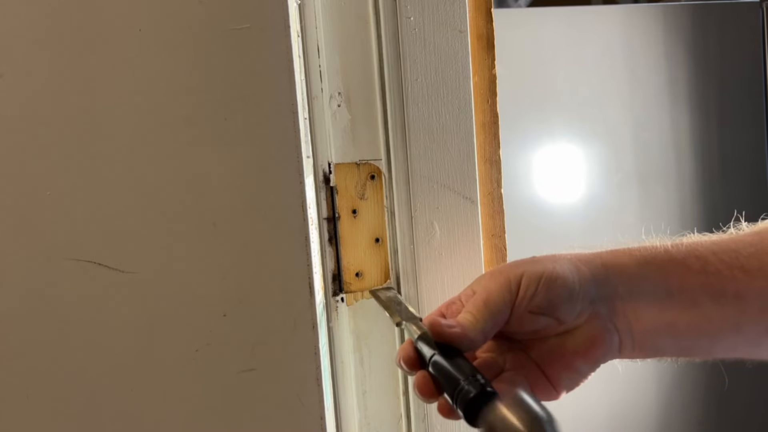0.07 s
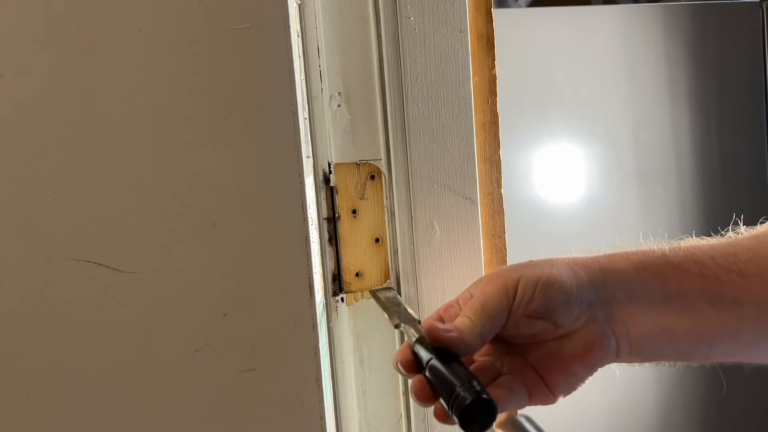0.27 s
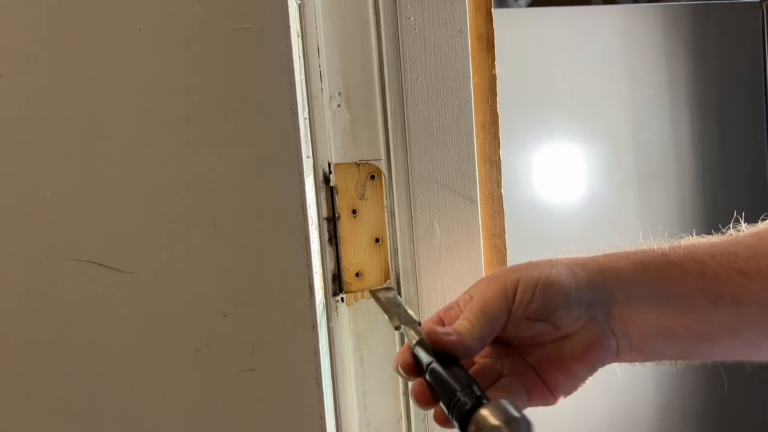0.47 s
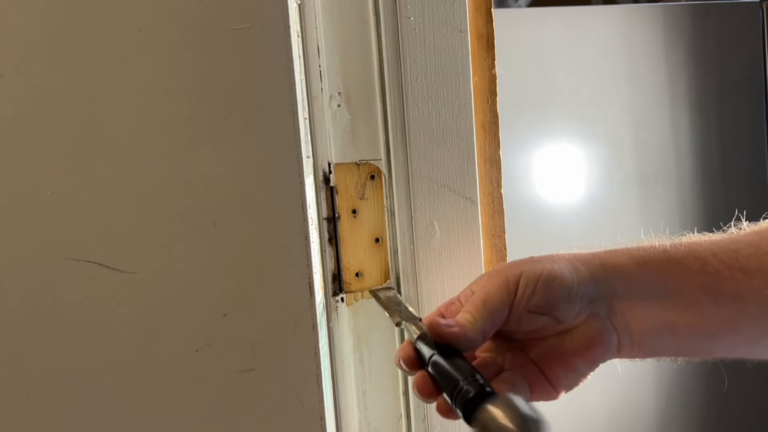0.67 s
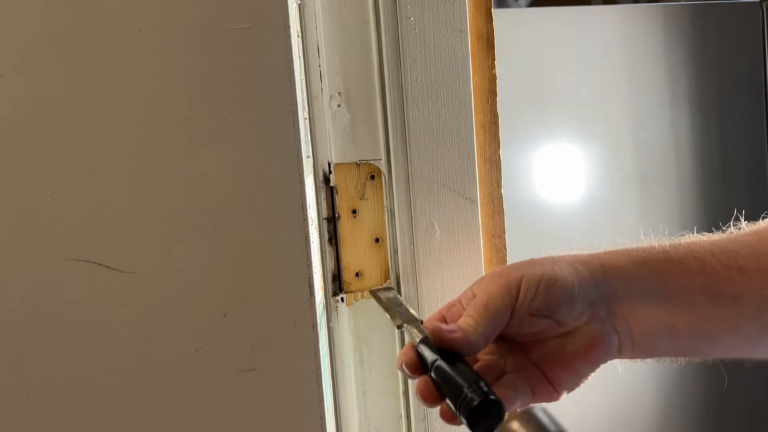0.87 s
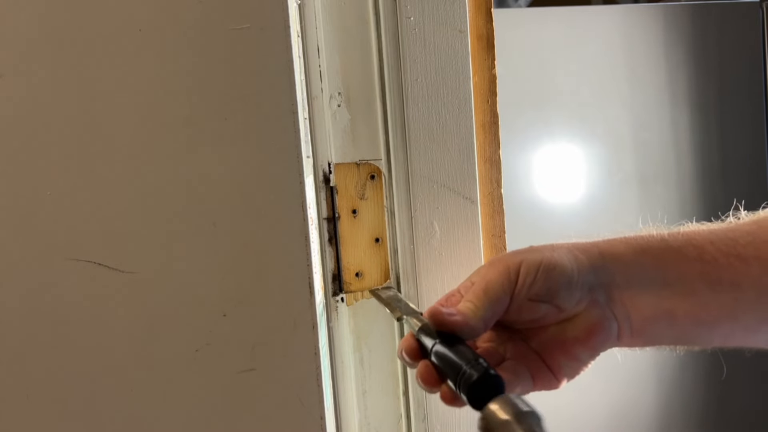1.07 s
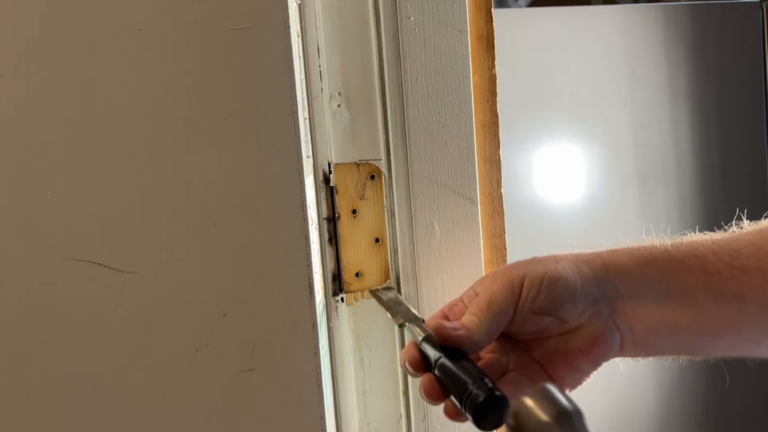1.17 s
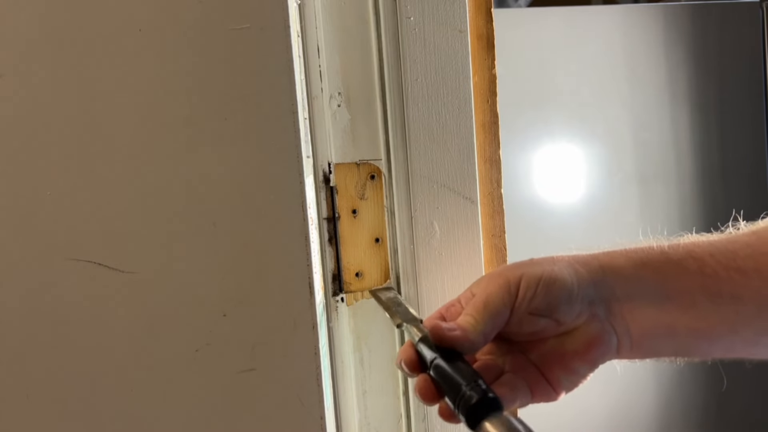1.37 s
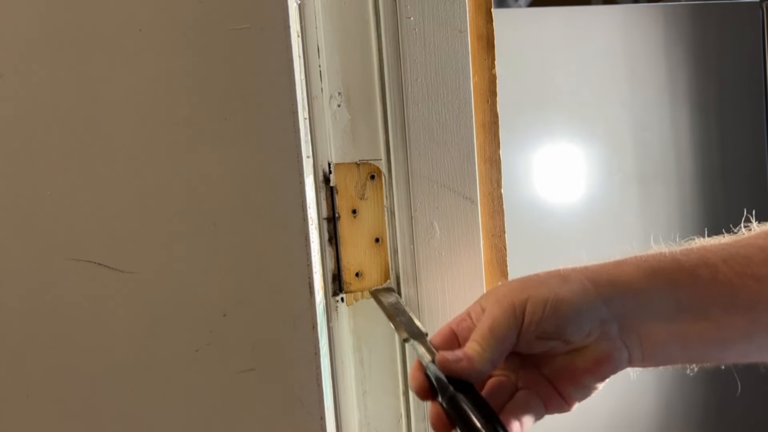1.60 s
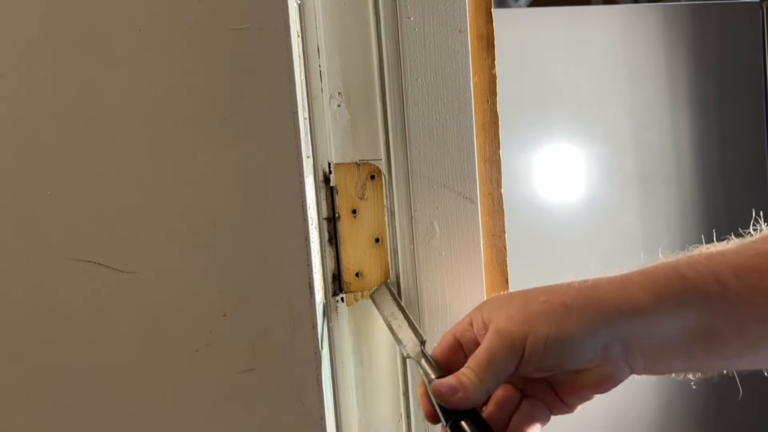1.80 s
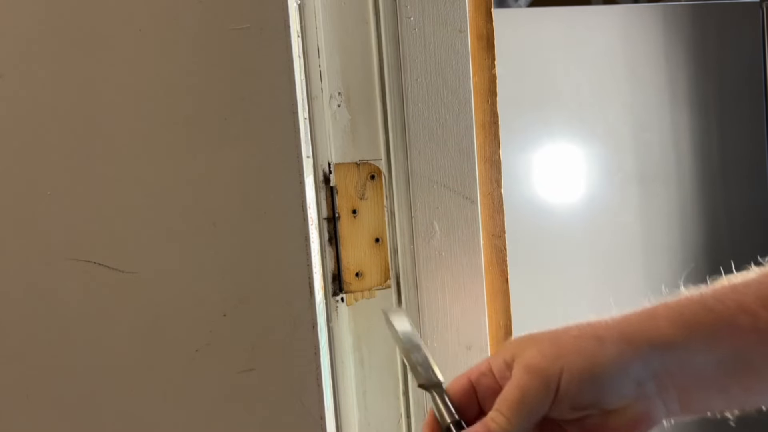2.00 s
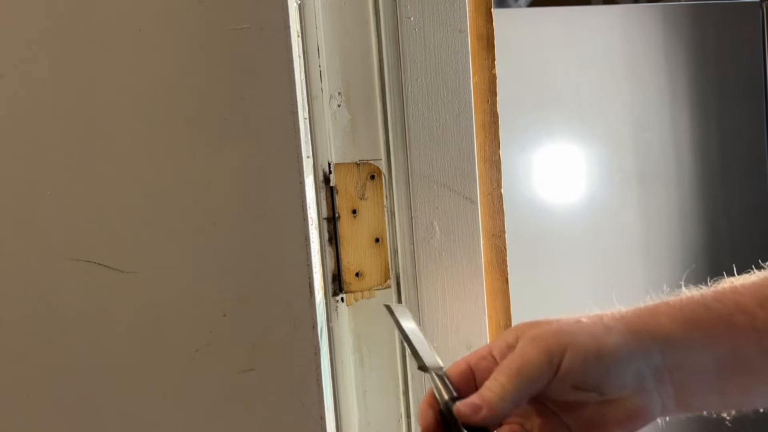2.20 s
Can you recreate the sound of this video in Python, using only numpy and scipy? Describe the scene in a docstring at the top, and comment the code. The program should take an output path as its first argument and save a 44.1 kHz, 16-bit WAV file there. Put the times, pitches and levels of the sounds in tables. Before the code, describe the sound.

A hammer drives a chisel into a wooden door frame in a garage. The fading tail of an earlier blow opens, then five loud blows fall at about 0.12, 0.43, 0.71, 0.98 and 1.26 seconds, the first slightly weaker. Each has a steel tick, woody crack and knock, and short boomy echo. Around 1.72-1.8 faint scraping ticks and two soft bumps follow over very faint low hum.

```python
"""A claw hammer drives a wood chisel into a door frame in a garage, a blow about every 0.3 s.
Each blow is a steel tick, a crack of noise, a knock of fading sines whose lows mostly arrive later
through the wood, a ring of door and garage, then the room's echo in fading bands of noise.
After the last blow the chisel is lifted out with short noise ticks and two soft bumps.
A faint low hum, made of steady coloured noise, lies below."""
import sys
import numpy as np
from scipy import signal
from scipy.fft import rfft, irfft
from scipy.io import wavfile

SR = 44100
rng = np.random.default_rng(int(sys.argv[2]) if len(sys.argv) > 2 else 0)


def log_audio(samples):
    """Write samples as a 16-bit WAV file to the path given in sys.argv[1]."""
    # one column per channel
    frames = np.atleast_2d(samples).T
    # limit to full scale, then quantise
    limited = np.clip(frames, -1, 1)
    pcm = np.round(limited * 32767).astype(np.int16)
    wavfile.write(sys.argv[1], SR, pcm)


N = 99225  # length of the scene [samples]
ECHO_START_S, ECHO_RISE_S = 0.0086, 0.006


def amp(db):
    """Turn decibels into a plain multiplier."""
    return 10 ** (np.asarray(db) / 20)


def at_hz(points, hz):
    """Read a curve of (frequency, value) points, with straight lines over log frequency."""
    points_hz, values = np.array(points).T
    return np.interp(np.log(hz), np.log(points_hz), values)


def rise(size, start_s, rise_s):
    """Stay at 0 until the start, then swell smoothly towards 1."""
    since_start = np.maximum(np.arange(size) / SR - start_s, 0)
    return 1 - np.exp(-since_start / rise_s)


def mode(hz, t60, delay_s, size):
    """A sine that starts after a delay and fades 60 dB in t60 seconds (one row for each delay)."""
    t = np.maximum(np.arange(size) / SR - np.reshape(delay_s, (-1, 1)), 0)
    return np.sin(2 * np.pi * hz * t) * amp(-60 * t / t60)


def bands(spectrum, size, t60=None):
    """Third-octave bands of stereo noise, each fading at its own rate; rms 1 before the fading."""
    # how alike left and right are: (frequency [Hz], likeness [-1 to 1])
    likeness = [(60, 0.91), (130, 1), (290, 0.53), (640, -0.075), (1410, 0.1), (3100, 0.09), (6820, 0.13),
                (15000, -0.02)]
    t = np.arange(size) / SR
    edges = 28 * 2 ** np.arange(0, 9.4, 1 / 3)
    warm_up = 4000  # samples for the filters to settle
    white = rng.standard_normal((2, 2, size + warm_up))
    out, power = 0, 0
    for k, (low, high) in enumerate(zip(edges, edges[1:])):
        sos = signal.butter(2, [low, high], "band", fs=SR, output="sos")
        # neighbouring bands take different noise; the filter runs twice for steeper edges
        mid, side = signal.sosfilt(np.vstack([sos, sos]), white[k % 2])[:, warm_up:]
        hz = np.sqrt(low * high)
        alike = np.clip(at_hz(likeness, hz), -1, 1)
        stereo = np.sqrt(1 + alike) * mid + np.sqrt(1 - alike) * side * [[1], [-1]]
        band = amp(at_hz(spectrum, hz)) * stereo
        power += np.mean(band ** 2)
        fade = 1 if t60 is None else amp(-60 * t / at_hz(t60, hz))
        out = out + band * fade
    return out / np.sqrt(power)


def strike(times, levels_db, response):
    """Play one stereo response at each time and level; a time may lie up to 0.2 s before zero."""
    lead = int(0.2 * SR)
    out = np.zeros((2, N + lead + response.shape[1]))
    for s, db in zip(times, levels_db):
        i = int(s * SR) + lead
        out[:, i:i + response.shape[1]] += amp(db) * response
    return out[:, lead:lead + N]


def hammer(echo, other_echo):
    """Each blow sets off tick, crack, knock, door ring, echo and a long tail."""
    # blows: (time [s], knock level [dB], bass of the knock and level of the crack [relative dB],
    # tick level [dB], room level [dB], long tail level [dB], tail held up [dB per s])
    blows = [(-.165, -22, -0.5, -17, -4.5, -21.5, 60), (0.1233, 1, -6.5, -14, -7.5, -16.5, 48),
             (0.4266, 4, -3.2, -15.5, -7, -14, 21), (0.7096, 3, -2.2, -16.5, -6.5, -13.5, 14),
             (0.9845, 4, -2.5, -14.5, -7, -15.5, 9.5), (1.2563, 2, -0.3, -15.5, -8.5, -16.5, 10)]
    tail = late_tail()
    cracks = make_cracks(len(blows))
    out = 0
    for b, (s, knock_db, bass_db, tick_db, room_db, tail_db, sustain_db) in enumerate(blows):
        impact = knock(bass_db) + amp(bass_db) * cracks[:, b]
        room = changed_echo(echo, other_echo) + door_ring()
        # lifting the level for the first 0.3 s slows the early fade
        held_tail = tail * amp(sustain_db * np.minimum(np.arange(SR) / SR, 0.3))
        out = out + strike([s], [tick_db], tick())
        out = out + strike([s], [knock_db], impact)
        out = out + strike([s], [room_db], room)
        out = out + strike([s], [tail_db], held_tail)
    return out


def tick():
    """Steel modes in a short swell, each with a new strength and phase, heard later on the right."""
    # steel of hammer face and chisel cap: (frequency [Hz], relative level [dB], right lags [ms])
    steel = [(2300, -10, 0.024), (3480, -9, 0.017), (4100, -8.5, 0.029), (4930, -3.5, 0.02),
             (5520, -11, 0.032), (6720, -4, .04), (7505, 5.5, 0.049), (8345, -6.5, .04), (9594, -18, 0.058),
             (11750, -18.5, 0.081), (13400, -16.5, 0.058), (15210, -19, .06)]
    swell_s, scatter_db = 0.00042, 1
    out = 0
    for hz, db, lag_ms in steel:
        t = np.maximum(np.arange(600) / SR - np.array([[0], [lag_ms / 1000]]), 0)
        strength = amp(db + scatter_db * rng.standard_normal())
        sine = np.sin(2 * np.pi * (hz * t + rng.random()))
        swell = t / swell_s * np.exp(1 - t / swell_s)  # peaks at 1
        out = out + strength * sine * swell
    return out


def make_cracks(count):
    """Fibres tearing after the tick: a different short fading piece of coloured noise for each blow."""
    # colour of the tearing: (frequency [Hz], relative level [dB per Hz])
    tearing = [(880, -29), (1500, -1), (2350, -16.5), (2900, -9.5), (3910, -26.5), (6640, -25), (7480, -25),
               (10300, -50.5), (13200, -34), (16300, -54)]
    size, crack_db, t60 = 4000, -13.5, 0.04  # samples, relative dB, s
    noise = bands(tearing, count * size).reshape(2, count, size)
    fade = amp(-60 * np.arange(size) / SR / t60)
    return amp(crack_db) * noise * fade * rise(size, 0, 0.001)


def knock(bass_db):
    """Modes of chisel and frame: each arrives, swells and dies, its first swing inward."""
    # knock, most lows arriving later through the wood: (frequency [Hz], relative level [dB],
    # time to fade 60 dB [s], arrival [ms], left over right [dB], right lags [ms])
    knock_modes = [(184, -3.5, 0.034, 3.14, 0.95, 0.097), (268, 2, 0.03, 0.64, 1.4, 0.01),
                   (455, -0.5, 0.018, 2.05, -5, -0.16), (620, -2, 0.012, 1.7, -9.5, 0.34),
                   (1016, -2, 0.014, .85, 2, 0.18), (1395, -3.5, .008, 0.97, 6, 0.023),
                   (1701, -7, 0.0072, .95, 7, .05), (2930, -13, 0.0098, .4, -4.8, .05)]
    bass_below_hz, floor_hz, size = 700, 110.14, 4000
    bass_cycles, upper_cycles = 0.71, 0.21  # swelling time
    out = 0
    for hz, db, t60, arrival_ms, pan_db, lag_ms in knock_modes:
        ring = mode(hz, t60, (arrival_ms + np.array([0, lag_ms])) / 1000, size)
        cycles = upper_cycles if hz > bass_below_hz else bass_cycles
        swell = rise(size, arrival_ms / 1000, cycles / hz)
        sides_db = np.array([[pan_db], [-pan_db]]) / 2
        level_db = db + bass_db * (hz < bass_below_hz) + sides_db
        out = out - amp(level_db) * ring * swell  # minus: inward first
    return signal.sosfilt(signal.butter(2, floor_hz, "high", fs=SR, output="sos"), out)


def door_ring():
    """Low resonances fade as sines, with slightly new strengths at each blow."""
    # resonances of door and garage: (frequency [Hz], relative level [dB], time to fade 60 dB [s])
    resonances = [(64.7, -33, .6), (74.17, -30, 0.67), (99, -33, 0.41), (126.6, -30.5, 0.24),
                  (176.4, -25.5, 0.41), (199.4, -22.5, 0.27), (235.7, -21, 0.32), (251.95, -23.5, .3),
                  (276.8, -25, 0.46), (314.9, -27.5, 0.3), (327.8, -26, 0.32), (386.1, -23, 0.22),
                  (472.2, -13, 0.092), (506, -28.5, 0.083), (964.4, -30.5, .25), (1016, -29.5, .25),
                  (1260, -28.5, 0.17), (1398, -29, 0.18)]
    door_db, scatter_db = 13, 1.5
    start_s, rise_s = 0.008, 0.006
    out = 0
    for k, (hz, db, t60) in enumerate(resonances):
        strength = amp(db + scatter_db * rng.standard_normal())
        out = out + strength * (-1) ** k * mode(hz, t60, [0, 0], SR)  # every other one upside down
    return amp(door_db) * out * rise(SR, start_s, rise_s)


def room_echo():
    """The room's echo: noise that swells after a short wait and fades band by band."""
    # colour of the echo: (frequency [Hz], relative level [dB per Hz])
    echo_colour = [(18, -40), (30, -28.5), (195, -3.5), (260, -7.5), (376, -16), (465, 0.5), (808, -8.5),
                   (1200, -3.5), (2510, -20.5), (6650, -32.5), (8660, -40.5), (10400, -99.5),
                   (11900, -55.5), (13900, -59.5), (16300, -102)]
    # fading of the echo: (frequency [Hz], time to fade 60 dB [s])
    echo_fade = [(40, 0.4), (120, .35), (300, 0.18), (1000, 0.18), (3000, 0.2), (8000, .25), (14000, 0.49)]
    return bands(echo_colour, SR, echo_fade) * rise(SR, ECHO_START_S, ECHO_RISE_S)


def changed_echo(echo, other_echo):
    """The treble of the echo pattern turns towards another pattern, differently at each blow."""
    turn = 0.55 * rng.standard_normal()  # rad
    change = (np.cos(turn) - 1) * echo + np.sin(turn) * other_echo
    treble = signal.butter(1, 2000, "high", fs=SR, output="sos")
    return echo + signal.sosfilt(treble, change)


def late_tail():
    """A longer tail of noise that swells more slowly than the echo."""
    # colour of the tail: (frequency [Hz], relative level [dB per Hz])
    tail_colour = [(18, -32), (30, -11.5), (254, -5.5), (559, -2.5), (898, -2), (1080, -3), (1330, 1),
                   (2440, -19), (5390, -29), (7390, -33.5), (9620, -81), (12200, -74.5), (16300, -98)]
    # fading of the tail before it is held up: (frequency [Hz], time to fade 60 dB [s])
    tail_fade = [(40, 0.43), (120, 0.84), (300, 0.53), (1000, 0.48), (3000, 0.47), (8000, 0.48),
                 (14000, 0.26)]
    return bands(tail_colour, SR, tail_fade) * rise(SR, ECHO_START_S, 4 * ECHO_RISE_S)


def burst(spectrum, length_s):
    """A short coloured burst of noise with peak 1, 2 ms into the array."""
    size = 1024
    t = np.arange(size) / SR
    noise = rfft(rng.standard_normal(size) * t * np.exp(-2 * t / length_s))
    hz = np.arange(1, len(noise) + 1) * SR / size
    shaped = noise * amp(at_hz(spectrum, hz)) * (hz > spectrum[0][0])
    delay = np.exp(-2j * np.pi * hz * np.array([[0.002], [0.002]]))  # same on left and right
    out = irfft(shaped * delay, size)
    return out / np.abs(out).max()


def lifting():
    """The blade ticks as it scrapes free of the cut: noise bursts, each with a bright room echo."""
    # ticks: (time [s], peak level [dB])
    lift_ticks = [(1.7185, -61), (1.7325, -70), (1.742, -53), (1.7475, -48.5), (1.750, -61)]
    # colour of ticks and echo: (frequency [Hz], relative level [dB per Hz])
    scrape = [(1180, -38), (2000, -3.5), (4850, -7.5), (6040, -13), (6720, 0), (10100, -20), (13300, -1),
              (16300, -24)]
    # fading of the echo: (frequency [Hz], time to fade 60 dB [s])
    bright_fade = [(2000, 0.35), (14000, 0.16)]
    tick_s, room_db = 0.0023, -6.5  # burst length, echo level relative to the tick
    # start 2 ms early to make up for the wait inside the burst
    ticks = sum(strike([s - 0.002], [db], burst(scrape, tick_s)) for s, db in lift_ticks)
    bright = bands(scrape, SR // 2, bright_fade) * rise(SR // 2, 0, ECHO_RISE_S)
    times, levels_db = np.transpose(lift_ticks)
    return ticks + strike(times, levels_db + room_db, bright / np.abs(bright).max())


def bumping(echo):
    """The blade softly bumps the wood: low fading sines and a dulled room echo."""
    # bumps: (time [s], level [dB], room level [dB])
    bumps = [(1.75, -42, -44), (1.796, -54, -56)]
    # modes of the bump: (frequency [Hz], relative level [dB], time to fade 60 dB [s])
    bump_modes = [(296, 7, 0.041), (627, 1.5, 0.032), (184, -1, 0.05), (109, -0.5, 0.11)]
    size, rise_s = 8000, 0.0034
    ring = sum(amp(db) * mode(hz, t60, [0, 0], size) for hz, db, t60 in bump_modes)
    bump = ring * rise(size, 0, rise_s)
    dull_echo = signal.lfilter([0.1], [1, -0.9], echo)  # smoothing takes away treble
    times, levels_db, room_db = np.transpose(bumps)
    return strike(times, levels_db, bump) + strike(times, room_db, dull_echo)


def air():
    """The faint hum below: steady noise, strongest in the lows."""
    # colour of the hum: (frequency [Hz], relative level [dB per Hz])
    air_colour = [(18, -37), (30, -9), (101, -3), (146, -20.5), (175, -15), (465, -32), (516, -31),
                  (638, -41.5), (1560, -32.5), (2380, -36), (2860, -55.5), (4030, -48), (10400, -63.5),
                  (13200, -45), (16300, -67)]
    return amp(-60) * bands(air_colour, N)


def scene():
    """Blows first, then the lifting and its bumps, over the hum."""
    echo, other_echo = room_echo(), room_echo()
    return hammer(echo, other_echo) + lifting() + bumping(echo) + air()


def record(dry):
    """The microphone dips near 10 kHz, peaks are cut off at full scale, the top is filtered away."""
    dip_hz, dip_width_hz, cutoff_hz = 9900, 1500, 16400
    dip_band = signal.lfilter(*signal.iirpeak(dip_hz, dip_hz / dip_width_hz, SR), dry)
    loud = np.clip(dry - dip_band, -1, 1)
    top_cut = signal.cheby2(12, 60, cutoff_hz, fs=SR, output="sos")
    return np.clip(signal.sosfilt(top_cut, loud), -1, 1)


dry = scene()
out = record(dry)
log_audio(out)
```